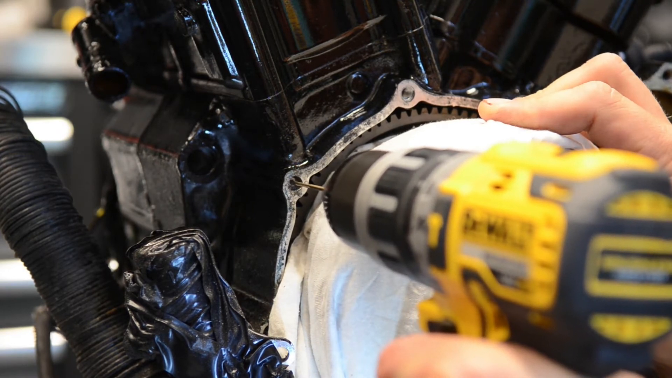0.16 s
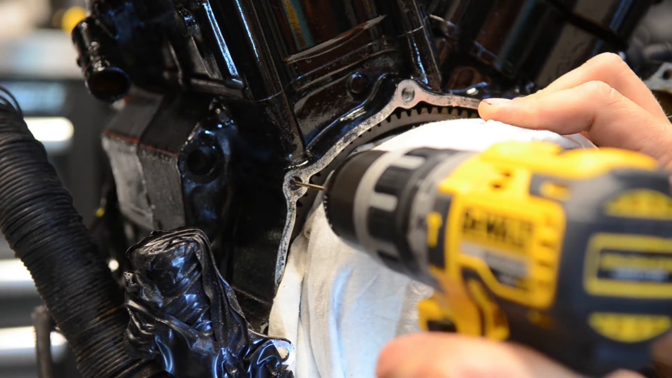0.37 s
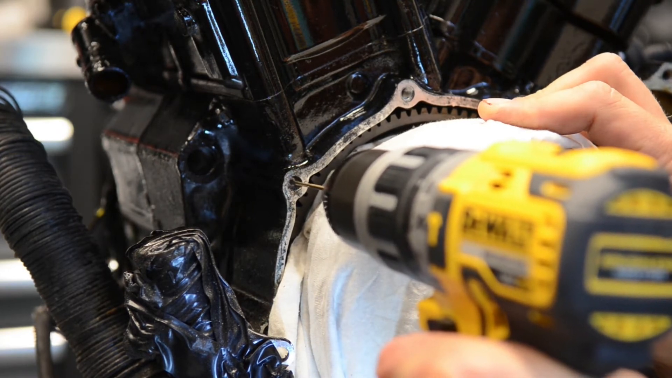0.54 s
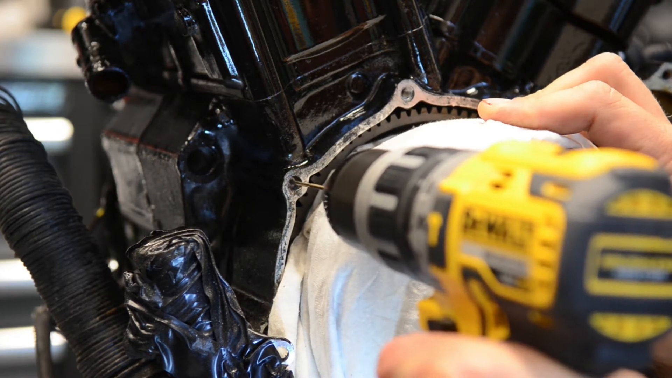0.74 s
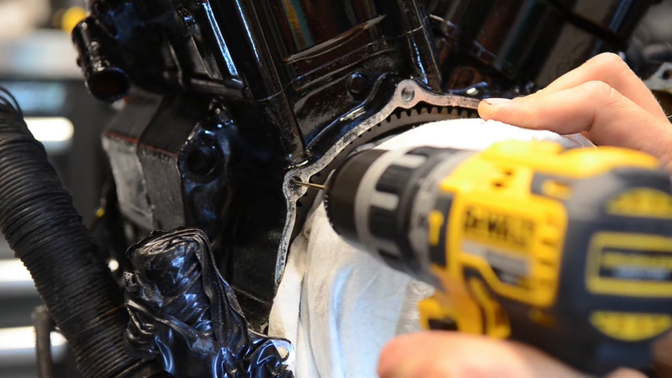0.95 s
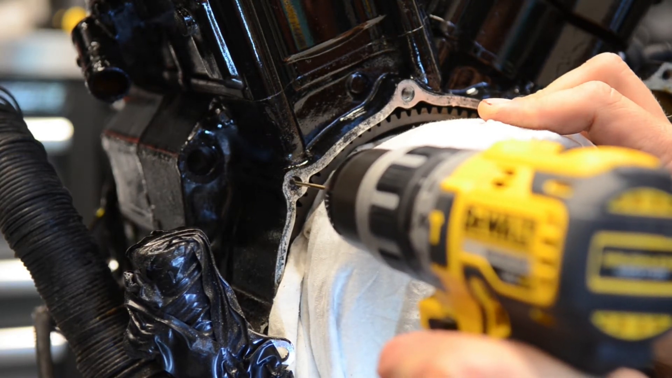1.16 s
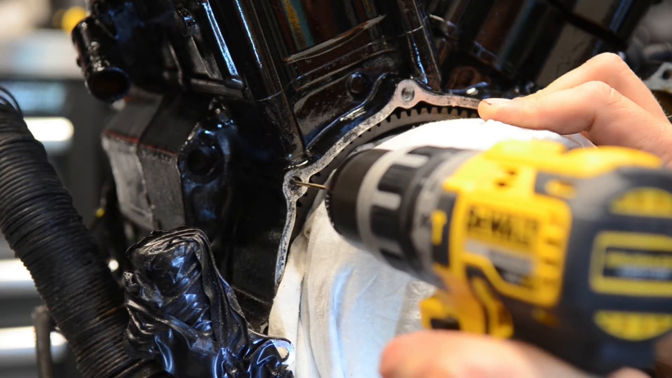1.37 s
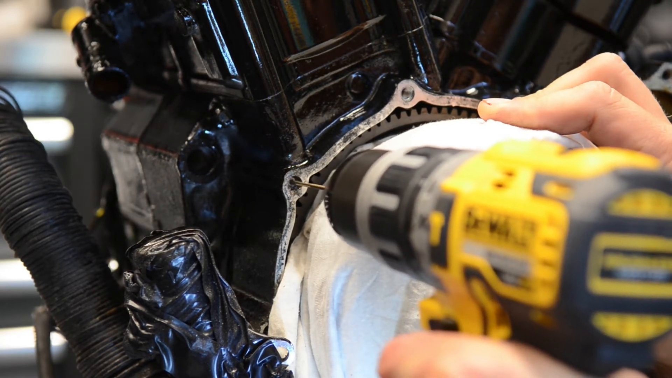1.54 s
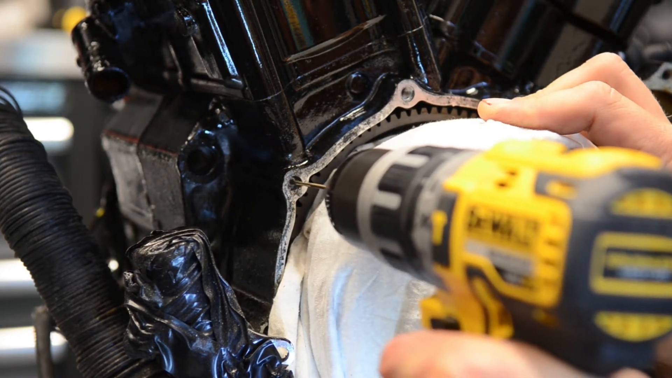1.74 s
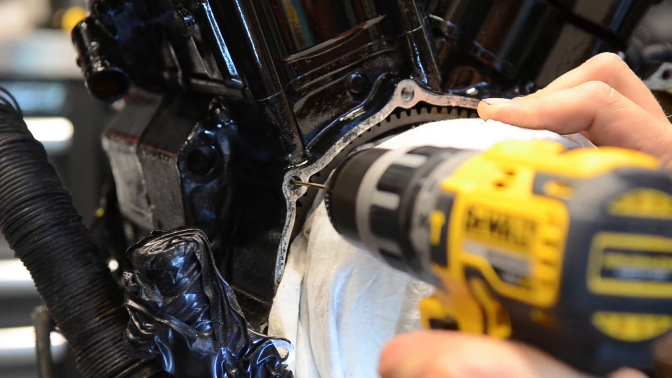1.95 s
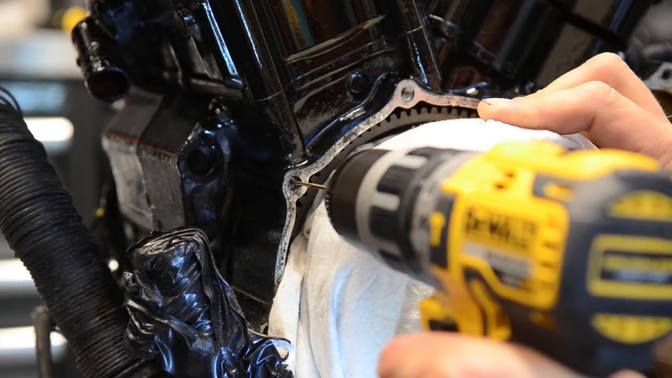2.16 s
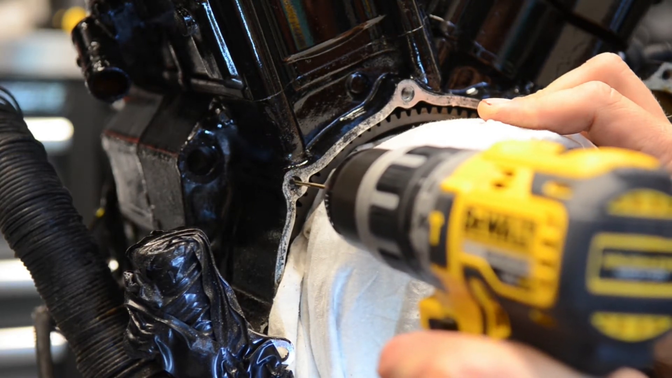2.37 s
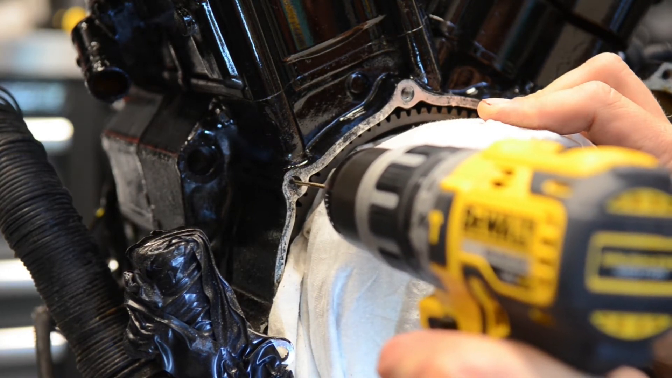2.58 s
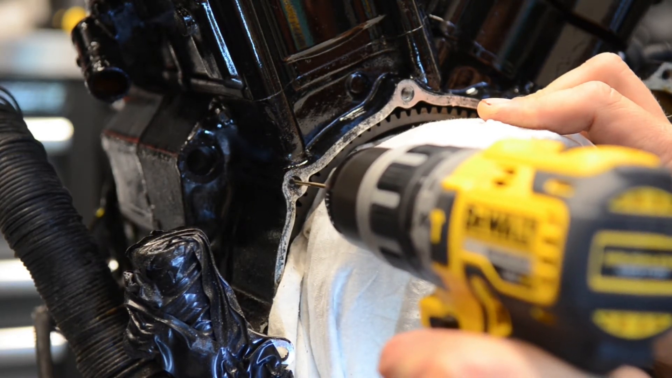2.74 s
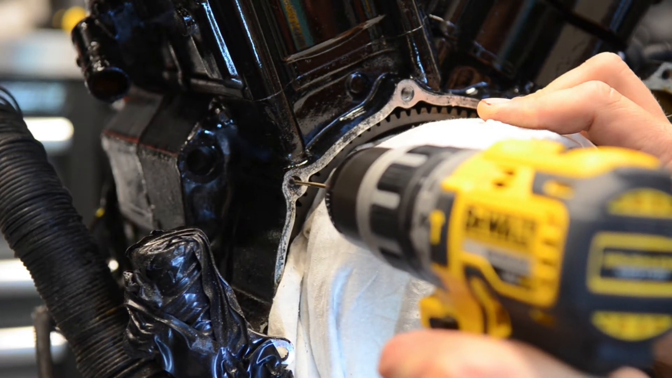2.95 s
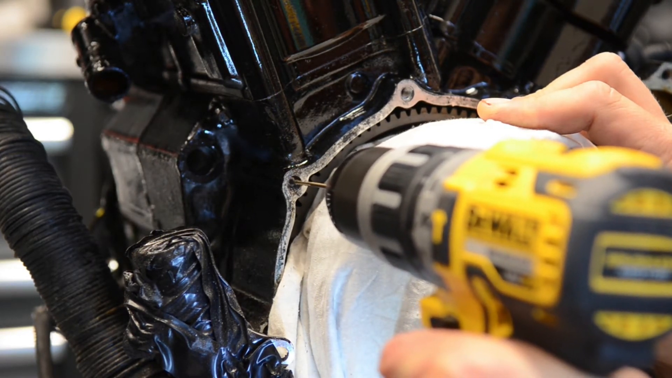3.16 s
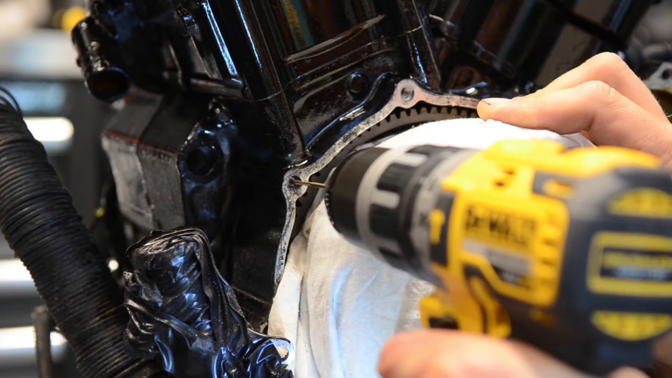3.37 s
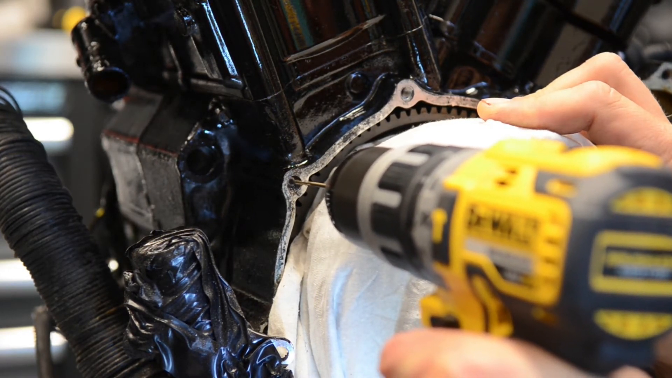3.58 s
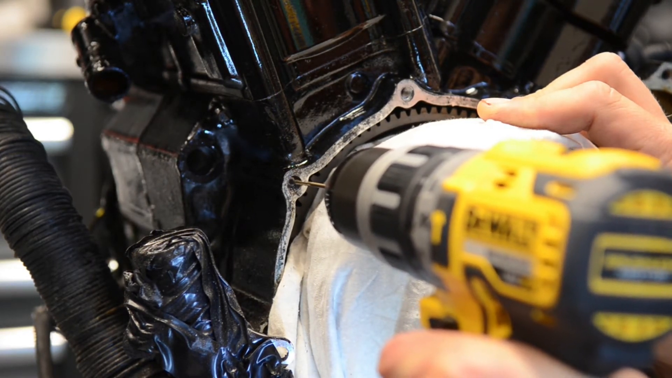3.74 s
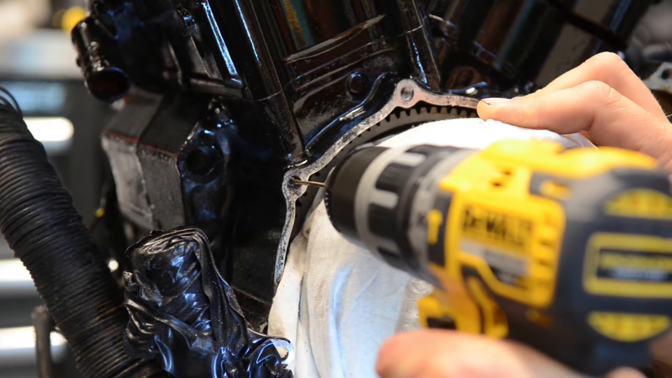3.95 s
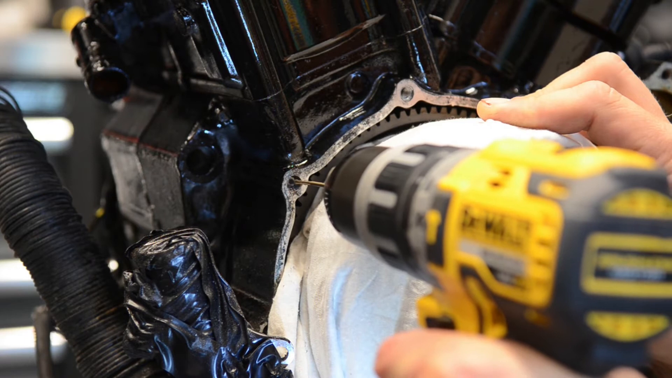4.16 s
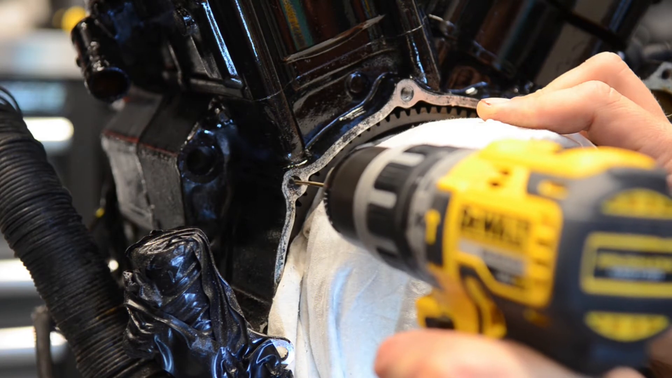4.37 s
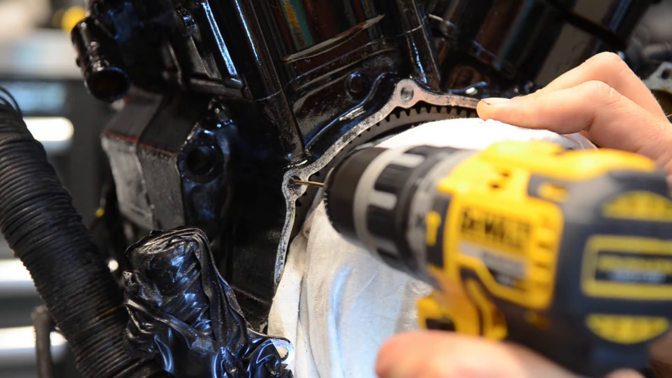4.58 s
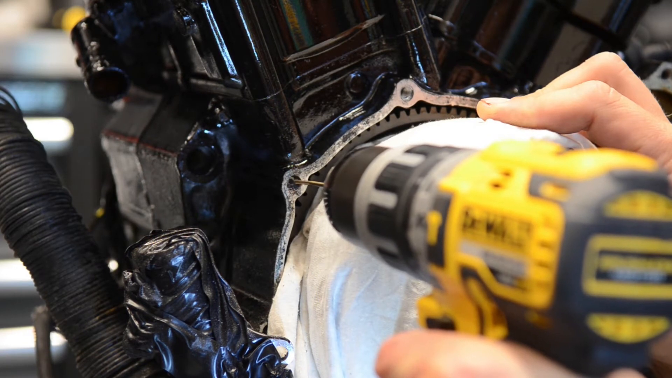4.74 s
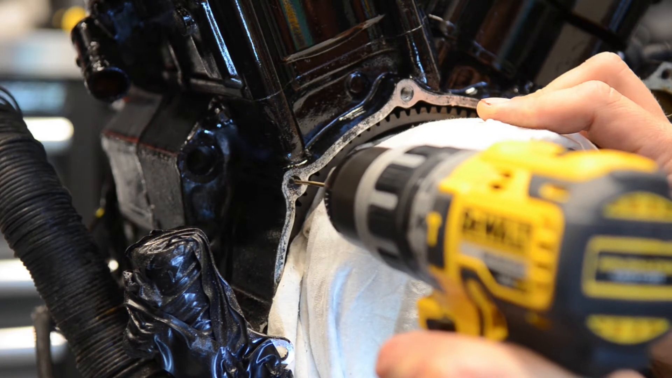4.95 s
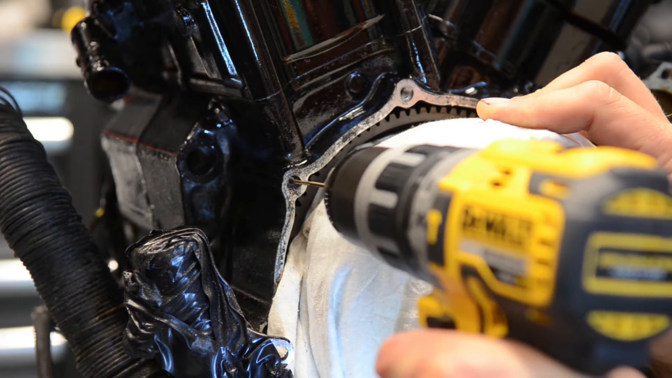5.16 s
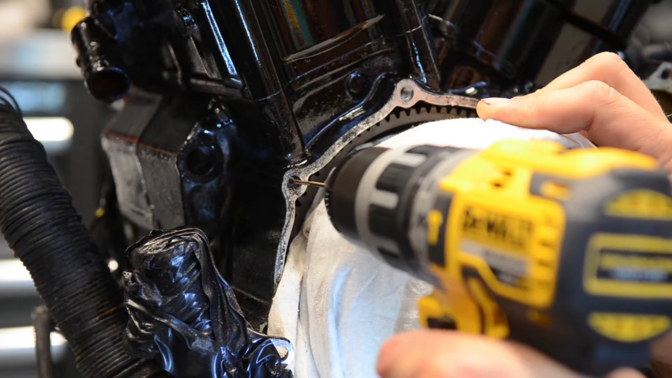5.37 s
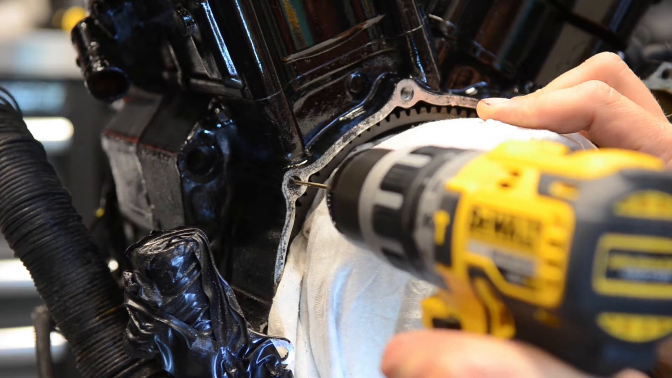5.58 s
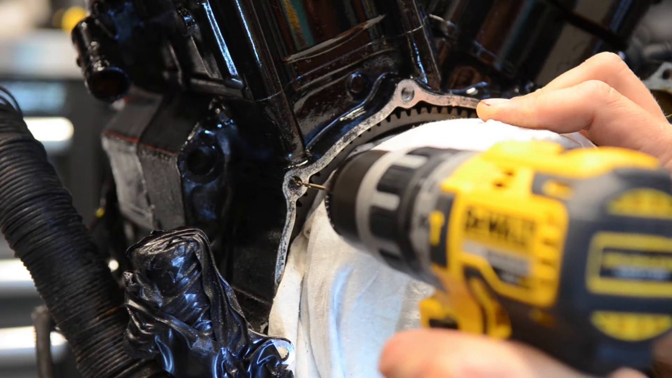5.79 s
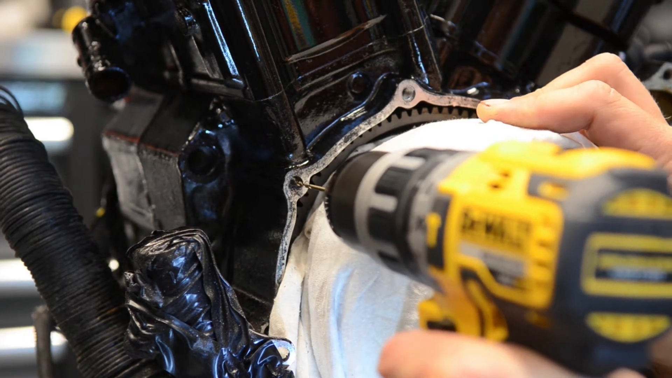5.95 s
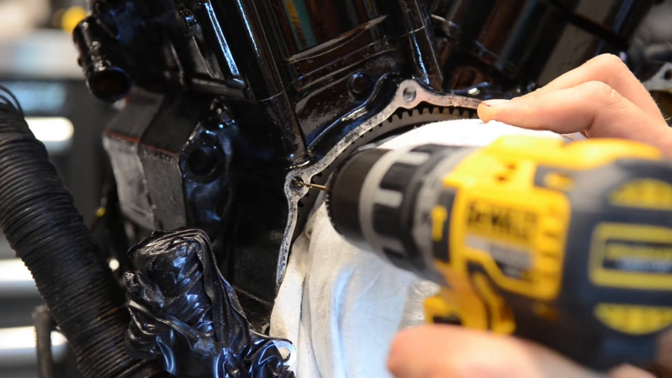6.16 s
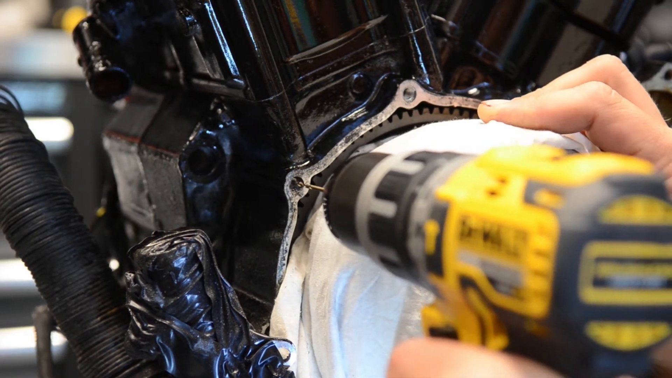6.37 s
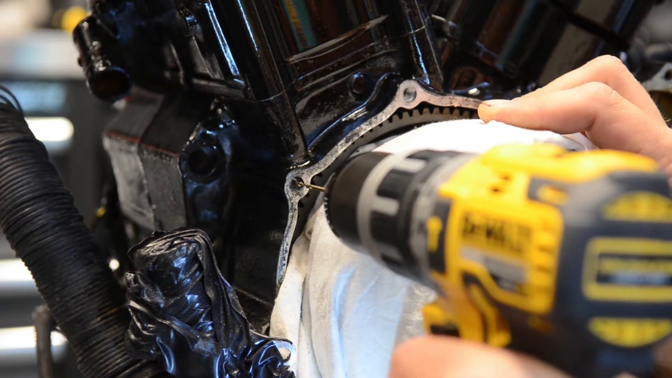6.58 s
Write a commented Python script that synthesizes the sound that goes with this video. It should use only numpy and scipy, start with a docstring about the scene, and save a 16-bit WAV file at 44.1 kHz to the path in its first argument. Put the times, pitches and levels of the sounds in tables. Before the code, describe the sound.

Sped-up drill whine and gritty cutting noise in a garage, suddenly falling to natural pitch, then a quick motor stop, dull knock and quiet street rumble.

```python
"""Open garage: a cordless drill bores into a metal casting, with traffic passing outside.
Rotor-locked tones ride on shaped noise from gears, fan and cutting edge; feedback delays make the echo.
The first five seconds run at double pace, pitches an octave up; then the pace is natural, the trigger
is let go, the motor brakes, the chuck knocks to a stop and only the street is left: tyre roar and
engine tones."""
import sys
import numpy as np
from scipy import signal
from scipy.fft import rfft, irfft, next_fast_len
from scipy.io import wavfile

SR = 44100
rng = np.random.default_rng(int(sys.argv[2]) if len(sys.argv) > 2 else 0)


def inscribe(sig):
    """Save sig as 16-bit PCM at rate SR to the path in sys.argv[1].

    A 1-D sig is mono; a 2-D sig holds one channel per row.
    Samples are clipped to [-1, 1] before scaling.
    """
    pcm = np.round(np.clip(np.atleast_2d(sig).T, -1, 1) * 32767)
    wavfile.write(sys.argv[1], SR, pcm.astype(np.int16))


N = 291942
T = np.arange(N) / SR
HURRY_ENDS_S = 5.031
USUAL_ROTOR_HZ = 155   # at natural pace
RELEASE_S, LOCK_S = 5.443, 5.688   # trigger let go, chuck at rest
AFTER_RELEASE_S, AFTER_LOCK_S = np.maximum(T - RELEASE_S, 0), np.maximum(T - LOCK_S, 0)
LATE_SIDE_DB = -5   # side tones are fainter at natural pace

# drill noise spectrum at double pace: f/Hz, level per Hz/dB
NOISE_HURRIED = [(88, -67), (150, -33), (296, -25), (574, -23.5), (608, -27), (915, -12.5), (1160, -18.5),
                 (1990, -9), (3110, -10.5), (3640, -3.5), (4420, -11), (7470, -19), (8390, -16),
                 (11200, -28.5), (15600, -36.5)]


def from_db(db):
    """dB to gain."""
    return 10 ** (np.asarray(db) / 20)


def in_time(rows):
    """Table columns against time, one value a sample."""
    s, *columns = np.transpose(rows)
    return [np.interp(T, s, column) for column in columns]


def at_hz(points, hz):
    """Read a spectrum on a log-frequency axis."""
    table_hz, table_db = np.transpose(points)
    return np.interp(np.log(hz), np.log(table_hz), table_db)


def drift(rate_hz):
    """Slow random curve: noise through two poles at rate_hz, one value per 40 samples, scaled to spread 1."""
    r = np.exp(-2 * np.pi * rate_hz * 40 / SR)
    white = rng.standard_normal(N // 40 + 2002)
    slow = signal.lfilter([1], [1, -2 * r, r * r], white)[2000:]
    return np.interp(np.arange(N) / 40, np.arange(len(slow)), slow / slow.std())


def spliced(hurried, natural):
    """The double-pace part, then at once the natural one."""
    return np.where(np.arange(N) < HURRY_ENDS_S * SR, hurried, natural)


def coloured(db_of_hz):
    """Noise of rms 1 with the given spectrum shape in dB."""
    size = next_fast_len(N)
    hz = np.maximum(np.arange(size // 2 + 1) * SR / size, 1)
    noise = irfft(rfft(rng.standard_normal(size)) * from_db(db_of_hz(hz)), size)[:N]
    return noise / noise.std()


def body_db(hz):
    """Housing and workpiece resonances as bumps on a spectrum."""
    # resonances at natural pace: f/Hz, width/Hz, level above the noise/dB
    body_modes = [(476, 23, -5), (764, 87, 7), (1006, 120, 6.5), (1100, 30, 1), (1355, 72, 6.5),
                  (1471, 23, 8.5), (1694, 16.6, 6), (2180, 19, -1.5), (2510, 170, -4), (2880, 24, 8.5),
                  (3120, 150, 2), (4110, 320, -3.5), (5940, 1150, -4), (7060, 300, 3.5), (8420, 5200, 12),
                  (9800, 1200, -2), (14000, 6900, 25.5), (15300, 2000, 9), (1980, 120, -3.5),
                  (1633, 60, 0.5)]
    return sum(level_db / (1 + (2 * (hz - centre_hz) / width_hz) ** 2)
               for centre_hz, width_hz, level_db in body_modes)


def rotor_hz():
    """Feed speed plus load changes through a first-order lag; natural pace halves it, braking is linear."""
    # speed under an even feed, at double pace: t/s, f/Hz
    feed_speed = [(0, 309.3), (.3, 309.2), (.65, 307.2), (1.2, 308.4), (1.29, 310.8), (1.53, 310.8),
                  (1.78, 307.5), (1.99, 309.9), (2.05, 308), (2.34, 307.2), (2.64, 308.6), (2.8, 310.6),
                  (3, 309.7), (4.4, 309.7), (4.6, 309.1), (5.03, 309.3)]
    # load, down as the bit bites, up as it is drawn back: start/s, hold/s, ease-off/s, target speed change/Hz
    load_changes = [(.332, .088, .007, -35.4), (.581, .017, .025, -32.3), (.696, .401, .046, 36.8),
                    (1.157, .011, .011, -22), (2.13, .007, .017, -18.3), (2.506, .02, .009, -33.3),
                    (2.586, .012, .008, -8)]
    lag_s, brake_hz_per_s = .022, 370
    load_hz = sum(hz * (T > s) * np.clip((s + hold_s + ease_s - T) / ease_s, 0, 1)
                  for s, hold_s, ease_s, hz in load_changes)
    r = np.exp(-1 / (lag_s * SR))
    hurried_hz = in_time(feed_speed)[0] + signal.lfilter([1 - r], [1, -r], load_hz + 1e-18)
    braking_s = np.clip(T - RELEASE_S, 0, LOCK_S - RELEASE_S)
    return spliced(hurried_hz, hurried_hz / 2 - brake_hz_per_s * braking_s)


def drill():
    """One rotor speed drives the tones and noises; returns (tones, noise)."""
    spin_up = .085   # share of extra speed at which the rotor counts as spinning free
    cutting_db, free_gain_db = -37, 1.5
    coast_s, coast_db_per_s, locked_db_per_s = .051, 32, 128   # the locked rate adds to the coast
    speed_hz = rotor_hz()
    angle = 2 * np.pi * np.cumsum(speed_hz * (1 + .0004 * drift(25))) / SR
    speed_ratio = speed_hz / spliced(2 * USUAL_ROTOR_HZ, USUAL_ROTOR_HZ)
    free = np.clip((speed_ratio - 1) / spin_up, 0, 1)
    noise_db = cutting_db + free_gain_db * free
    noise_db = noise_db - coast_db_per_s * np.maximum(AFTER_RELEASE_S - coast_s, 0)
    noise_db = noise_db - locked_db_per_s * AFTER_LOCK_S
    tones = gear_tones(speed_hz, speed_ratio, angle, free)
    tones += faint_tones(speed_ratio, angle, free, noise_db)
    noise = cutting_noise(speed_ratio, angle, noise_db) + free_buzz(free) + braking_rattle()
    return tones * (T < LOCK_S), noise


def tone(order, db, flicker_db, rate_hz, angle, free):
    """Sine at a multiple of rotor speed; its level flickers less as the rotor spins free."""
    steadied = .6   # share of the flicker lost when free
    level_db = db + flicker_db * (1 - steadied * free) * drift(rate_hz)
    return np.sqrt(2) * from_db(level_db) * np.sin(order * angle + rng.uniform(0, 2 * np.pi))


def gear_tones(speed_hz, speed_ratio, angle, free):
    """Gear whine: pinion mesh at order 12, orders 16 and 28, and tones that follow order 28's swings."""
    # whine: t/s, order 12 level before release/dB, order 28 level before braking/dB
    whine = [(0, -37, -47.5), (.22, -41, -63), (.31, -38, -49), (.42, -39.5, -52), (.48, -46, -48),
             (.54, -34.5, -54), (.575, -51, -48), (.6, -34, -46), (.63, -41, -50), (.68, -46, -51),
             (.8, -44.5, -57.5), (1.1, -48, -55), (1.18, -42.5, -50.5), (1.25, -38.5, -44.5),
             (1.5, -38.5, -45), (1.6, -41, -52), (1.68, -36.5, -46), (1.77, -41, -50), (1.84, -37.5, -49),
             (2.03, -41.5, -55), (2.11, -38, -43.5), (2.18, -44, -50), (2.24, -38, -49), (2.36, -47, -58),
             (2.47, -40, -47), (2.535, -38, -51), (2.6, -48, -50), (2.67, -36, -47.5), (2.74, -40.5, -53),
             (2.83, -38.5, -45), (2.9, -40, -57), (3.6, -38.5, -54), (4.45, -39.5, -57), (4.55, -41, -48.5),
             (4.67, -37.5, -60.5), (4.74, -39, -49), (4.9, -40, -58), (5.05, -39.5, -55), (5.2, -39, -54),
             (5.41, -36, -56), (5.435, -40, -53), (5.46, -34.5, -45)]
    # followers: order (rounded in use), usual level/dB, share of order 28's swing, gain when free/dB
    followers = [(26.1, -52, 0.45, -3), (23.1, -55, 0.5, 1), (22.13, -58.5, 0.36, 6.5),
                 (8.013, -55, 0.27, 12.5), (24.2, -68, .1, 10), (3, -62.5, .1, 4.5)]
    usual_mesh_db, usual_28_db = -38, -52
    order_16_db, against_mesh = -61.5, .94   # order 16 comes forward as the mesh tone dips
    mesh_hold_s, mesh_fade_db_per_s, mesh_drop_db = .091, 220, -6.5
    mesh_rings = .63   # share of the resonances that the falling mesh tone sweeps through
    released = AFTER_RELEASE_S > 0
    slowed = np.clip(1 - speed_ratio, 0, 1)
    braked = spliced(0, slowed)
    mesh_db, db_28 = in_time(whine)
    db_16 = order_16_db + against_mesh * (usual_mesh_db - mesh_db) - 7 * free - 90 * braked
    sweep_db = mesh_drop_db + mesh_rings * (body_db(12 * speed_hz) - body_db(12 * USUAL_ROTOR_HZ))
    sweep_db = sweep_db - mesh_fade_db_per_s * np.maximum(AFTER_RELEASE_S - mesh_hold_s, 0)
    tones = tone(12, mesh_db + released * sweep_db, 1.3 + 3 * released, 25, angle, free)
    tones += tone(16, db_16, 5, 40, angle, free)
    tones += tone(28, db_28 - 90 * braked, 3.5, 25, angle, free)
    side_db = spliced(0, LATE_SIDE_DB) - 160 * slowed
    for order, usual_db, share, free_db in followers:
        db = usual_db + share * (db_28 - usual_28_db) + free_db * free + side_db
        tones += tone(round(order), db, 2.76, 19, angle, free)
    return tones


def faint_tones(speed_ratio, angle, free, noise_db):
    """Faint motor and gear tones; a shift in pitch meets another part of the housing's response."""
    # order (multiple of rotor speed), level re cutting noise at usual speed and double pace/dB
    faint_orders = [(1, -38), (2, -34), (4, -27), (6, -19.5), (30.88, -27), (32.12, -25), (32.88, -28.5)]
    braked = spliced(0, np.clip(1 - speed_ratio, 0, 1))
    tones = np.zeros(N)
    for order, db in faint_orders:
        usual_hz = 2 * USUAL_ROTOR_HZ * order
        shift_db = at_hz(NOISE_HURRIED, usual_hz * speed_ratio) - at_hz(NOISE_HURRIED, usual_hz)
        housing_db = np.minimum(shift_db, 1) - 20 * braked
        level_db = noise_db + db + housing_db + spliced(0, LATE_SIDE_DB)
        tones += tone(order, level_db, 3.86, 13.4, angle, free)
    return tones


def cutting_noise(speed_ratio, angle, noise_db):
    """Gear, fan and cutting noise through the resonances; it throbs once a turn."""
    # spectrum at natural pace: f/Hz, level per Hz/dB
    noise_natural = [(88, -57), (150, -18), (353, -24.5), (454, -5), (585, -14.5), (1010, -5), (1580, -6),
                     (1810, 1), (2070, -5), (4170, -13.5), (5580, -22.5), (8560, -35), (15600, -69.5)]
    throb = .12
    fan_hz, fan_power = 2400, .9   # fan air above fan_hz (doubled at double pace) grows as a power of speed
    hiss = spliced(coloured(lambda hz: at_hz(NOISE_HURRIED, hz) + body_db(hz / 2)),
                   coloured(lambda hz: at_hz(noise_natural, hz) + body_db(hz)))
    fan = spliced(*(signal.sosfiltfilt(signal.butter(2, fan_hz * pace, "high", fs=SR, output="sos"), hiss)
                    for pace in (2, 1)))
    hiss += (speed_ratio ** fan_power - 1) * fan
    return from_db(noise_db + .5 * drift(2.2)) * (1 + throb * np.sin(angle)) * hiss


def garage(x):
    """Ten parallel feedback delays, highs decaying faster; lags and decay halve at double pace."""
    t60_s, wall_cut_hz = .38, 3600   # low-frequency decay and its treble corner, at natural pace
    size = next_fast_len(N + SR)   # padded
    hz = np.arange(size // 2 + 1) * SR / size
    lags_s, sound, paces = rng.uniform(.015, .045, 10), rfft(x, size), []
    for pace in (2, 1):
        decay_s = t60_s / (1 + (hz / pace / wall_cut_hz) ** 2)
        loops = [from_db(-60 * lag_s / decay_s) * np.exp(-2j * np.pi * hz * lag_s / pace)
                 for lag_s in lags_s]
        echo = sum((-1) ** k * loop / (1 - loop) for k, loop in enumerate(loops)) / np.sqrt(10)
        paces.append(irfft(sound * echo, size)[:N])
    return spliced(*paces)


def street():
    """Traffic: shaped-noise tyre roar that wavers, plus engine sines."""
    return tyre_roar() + engine_drones() + idling_engine()


def tyre_roar():
    """Shaped noise with a slowly wavering level."""
    # spectrum at natural pace: f/Hz, level per Hz/dB
    street_spectrum = [(15, -35), (30, -30), (50, -8.5), (75, -17.5), (105, -6.5), (160, -7), (290, -9),
                       (350, -10), (497, -7), (617, -12.5), (760, -5.5), (980, -1.5), (1240, -8),
                       (5000, -37), (15600, -50.5)]
    roar = spliced(from_db(-.5) * coloured(lambda hz: at_hz(street_spectrum, hz / 2)),
                   coloured(lambda hz: at_hz(street_spectrum, hz)))
    return from_db(-55.5 + 1.2 * drift(3)) * roar


def engine_drones():
    """Passing engines: each a low sine that swells, sinks in pitch and fades."""
    # start/s, end/s, f at start/Hz, f at end/Hz, mean level/dB
    drones = [(0, 1.398, 78, 74, -81.5), (0, 1.2, 120, 111.6, -77.5), (1.6, 2.9, 140, 128.3, -77),
              (3.7, 4.935, 118, 107.8, -72)]
    out = np.zeros(N)
    for start_s, end_s, from_hz, to_hz, db in drones:
        part = np.clip((T - start_s) / (end_s - start_s), 0, 1)
        swell = np.minimum(8 * np.minimum(part, 1 - part), 1) * from_db(db + 2.5 * drift(4))
        hz = from_hz + (to_hz - from_hz) * part
        out += np.sqrt(2) * swell * np.sin(2 * np.pi * np.cumsum(hz) / SR)
    return out


def idling_engine():
    """A near engine idling by at natural pace: a sine and its half-pitch partner."""
    # t/s, f/Hz, level/dB
    idler = [(5.03, 96.4, -66.5), (5.3, 94, -70), (5.55, 94, -68), (5.7, 92.3, -58), (5.9, 93.6, -71),
             (6.15, 92, -74), (6.3, 93.4, -61), (6.45, 92.4, -66), (6.62, 91.4, -65)]
    # half-pitch partner: t/s, level/dB
    idler_half = [(5.03, -79), (5.8, -83), (6.0, -74), (6.62, -70)]
    hz, db = in_time(idler)
    half_db = in_time(idler_half)[0]
    angle = 2 * np.pi * np.cumsum(hz) / SR
    full = from_db(db) * np.sin(angle)
    half = from_db(half_db) * np.sin(angle / 2)
    return spliced(0, np.sqrt(2) * (full + half))


def free_buzz(free):
    """Unloaded gears buzz in noise bands while the bit spins free."""
    # f/Hz, width/Hz, relative level/dB
    buzz_bands = [(3640, 600, 0), (5700, 730, -5)]
    buzz = coloured(lambda hz: 10 * np.log10(sum(
        from_db(2 * db) / (1 + (2 * (hz - mid_hz) / width_hz) ** 4) for mid_hz, width_hz, db in buzz_bands)))
    return from_db(-45 + 1.2 * drift(30)) * free * buzz


def braking_rattle():
    """Gears rattle loose as the motor brakes: band noise, up just before release, fading once locked."""
    # centre f/Hz, width/Hz
    rattle_hz, width_hz = (4020, 990)
    rise_s, fade_db_per_s = .03, 210
    rattle = coloured(lambda hz: -20 * np.log10(1 + (2 * (hz - rattle_hz) / width_hz) ** 2))
    rattle *= np.clip((T - RELEASE_S) / rise_s + 1, 0, 1) ** 2
    return from_db(-47 - fade_db_per_s * AFTER_LOCK_S + drift(30)) * rattle


def chuck():
    """Each knock is a short dull crack of noise over decaying sine modes."""
    # knocks: t/s, level/dB
    knocks = [(5.662, -33), (5.69, -44)]
    # modes: f/Hz, relative level/dB, t60/s
    chuck_modes = [(490, -1, 0.11), (990, 2, 0.054), (1450, -2, .04), (1950, 8.5, 0.043), (3080, 4, .04),
                   (3970, 1, 0.049), (4420, -4, 0.036)]
    crack_cut_hz, crack_t60_s = 4800, .03
    dull = signal.butter(4, crack_cut_hz, fs=SR, output="sos")
    out = np.zeros(N)
    for s, knock_db in knocks:
        t = np.arange(N - round(s * SR)) / SR
        rings = sum(from_db(db - 9.5) * np.sin(2 * np.pi * hz * t) * from_db(-60 * t / t60_s)
                    for hz, db, t60_s in chuck_modes)
        crack = from_db(-3) * rng.standard_normal(len(t)) * from_db(-60 * t / crack_t60_s)
        out[-len(t):] += from_db(knock_db) * (rings + signal.sosfilt(dull, crack))
    return out


def scene():
    """Same signal on both channels; the whine beams at the microphone and fills the room less."""
    tones, noise = drill()
    noise = noise + chuck()
    echo = garage(from_db(-8.5) * noise + from_db(-12) * tones)
    mic_hiss = from_db(-86) * rng.standard_normal(N)
    mono = tones + noise + echo + street() + mic_hiss
    return np.stack([mono, mono])


def record(dry):
    """Steep low-pass at 15.68 kHz, then a small steady offset."""
    return signal.sosfilt(signal.ellip(12, .5, 75, 15680, fs=SR, output="sos"), dry) + .0006


dry = scene()
out = record(dry)
inscribe(out)
```